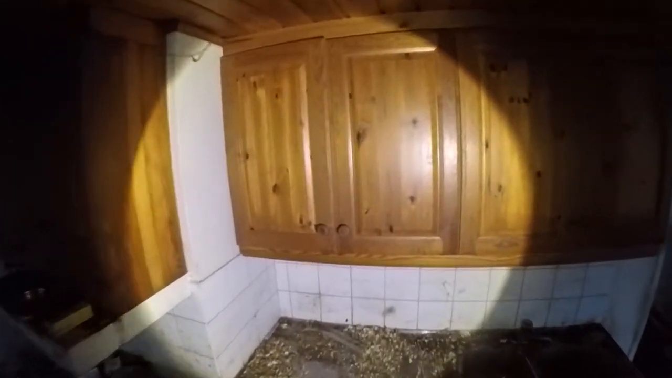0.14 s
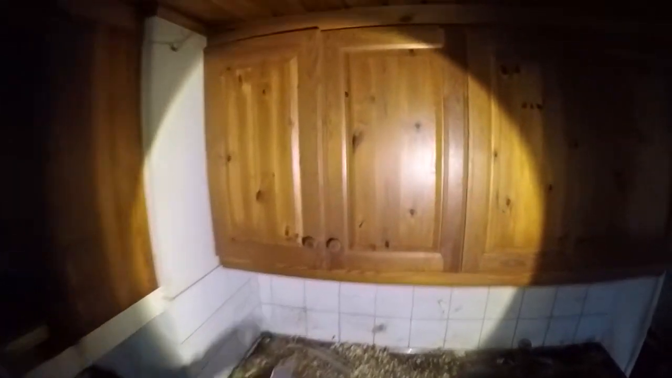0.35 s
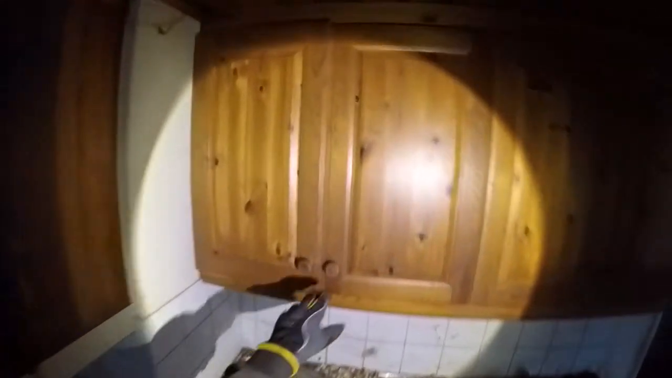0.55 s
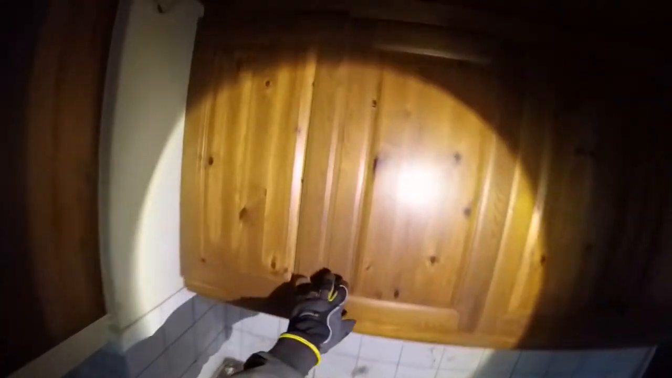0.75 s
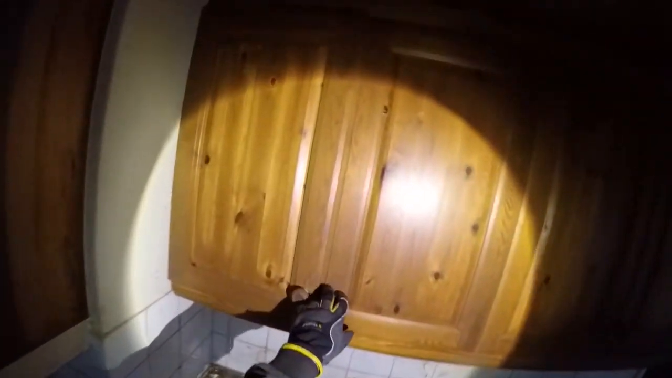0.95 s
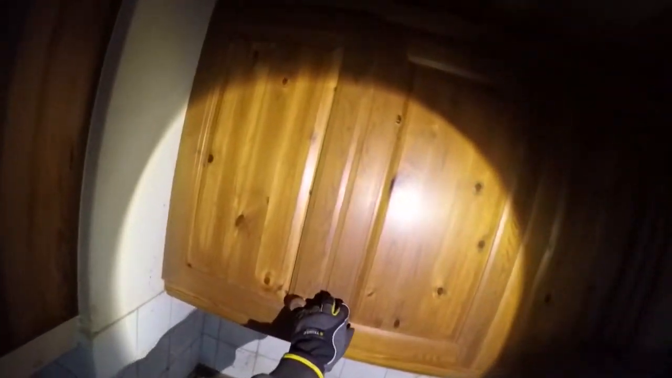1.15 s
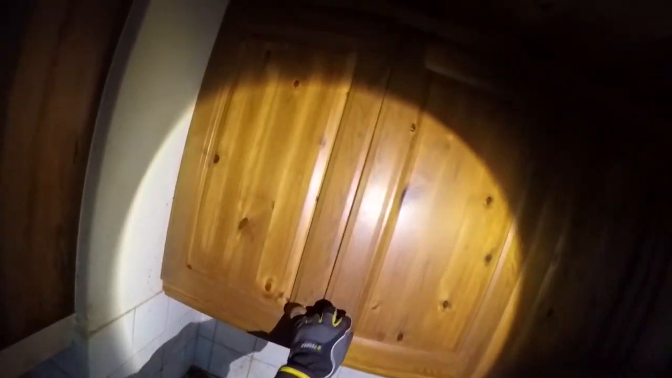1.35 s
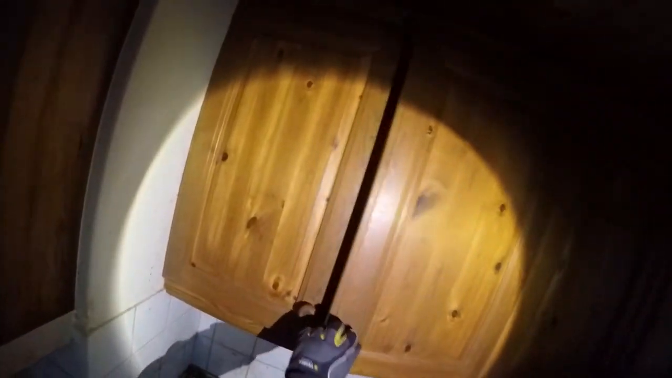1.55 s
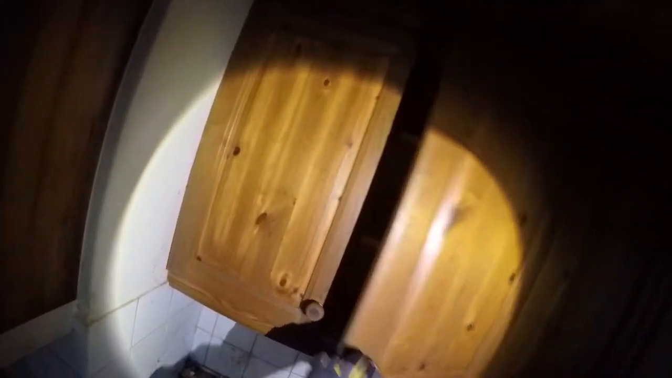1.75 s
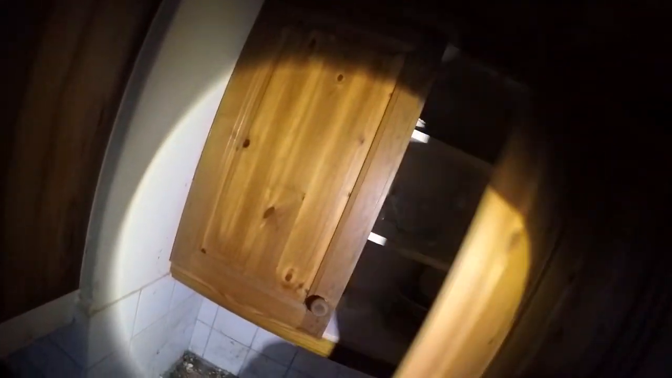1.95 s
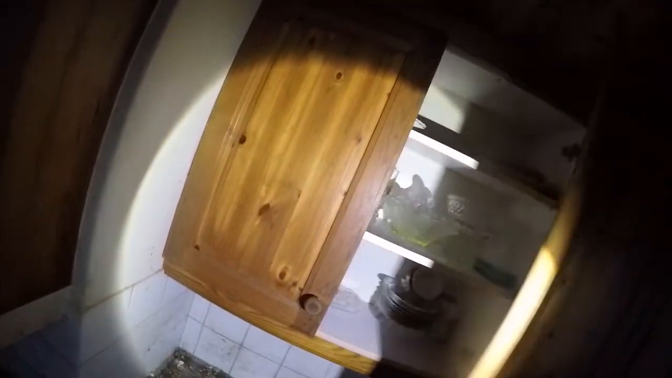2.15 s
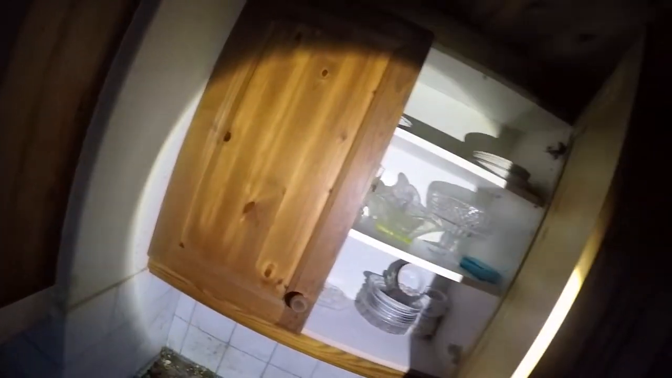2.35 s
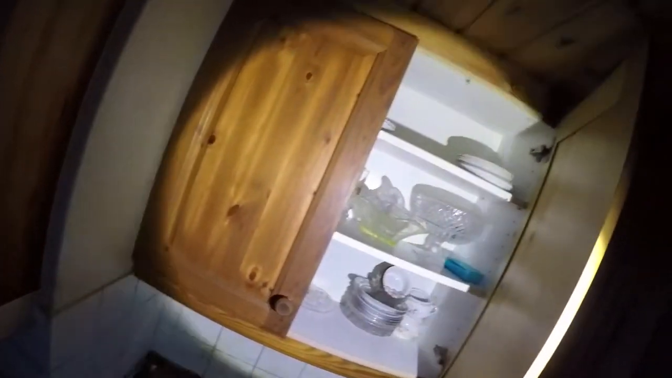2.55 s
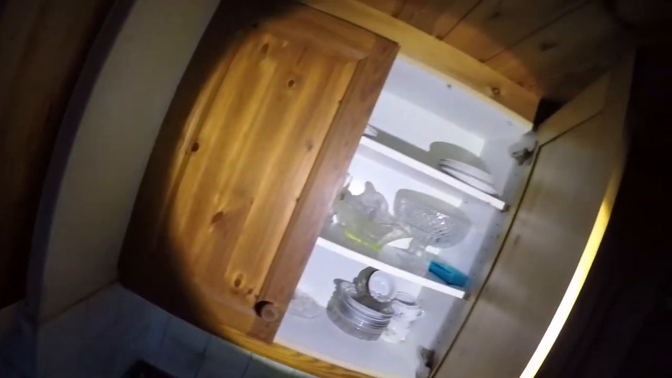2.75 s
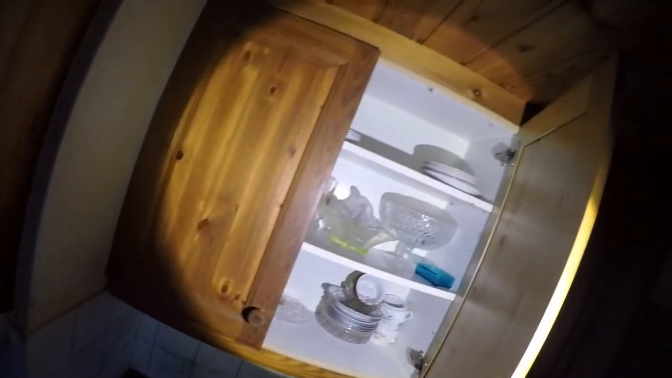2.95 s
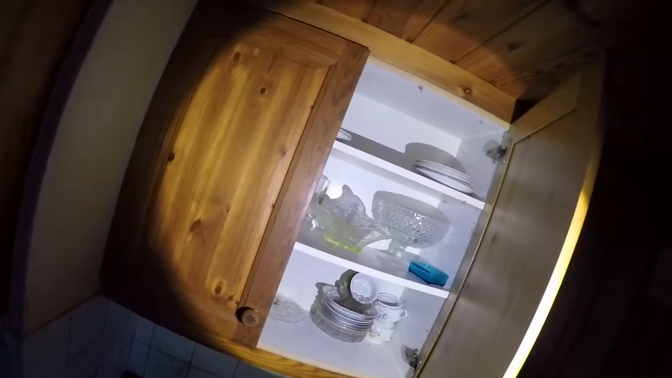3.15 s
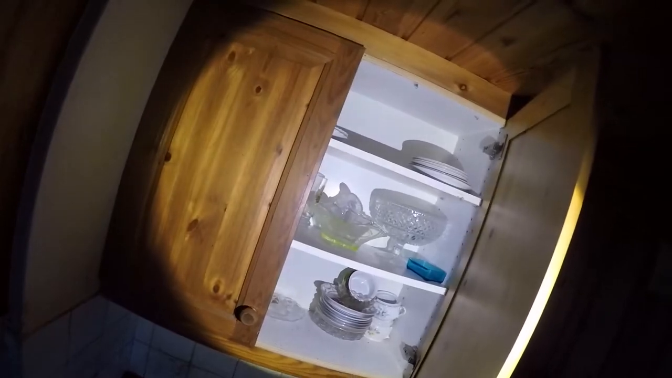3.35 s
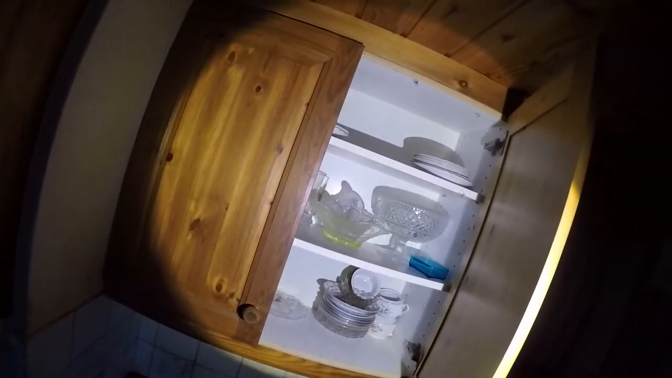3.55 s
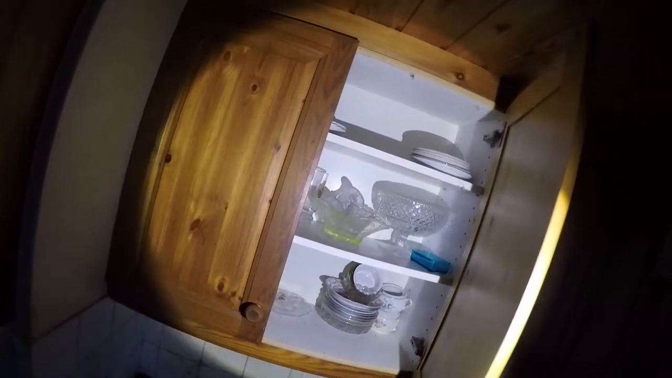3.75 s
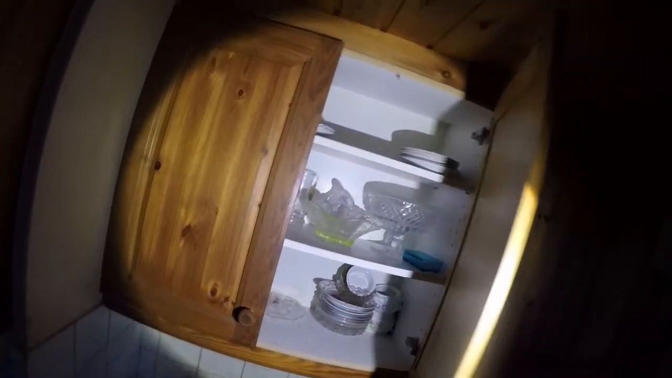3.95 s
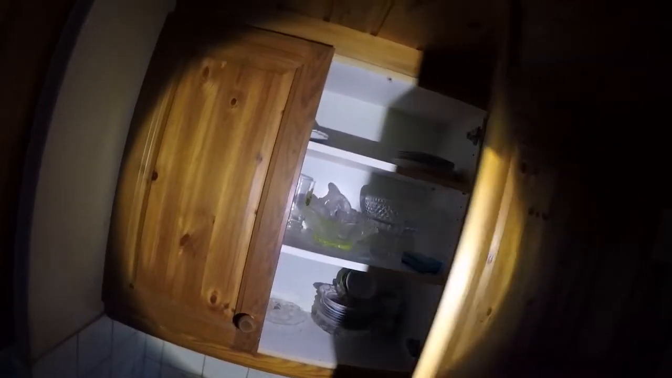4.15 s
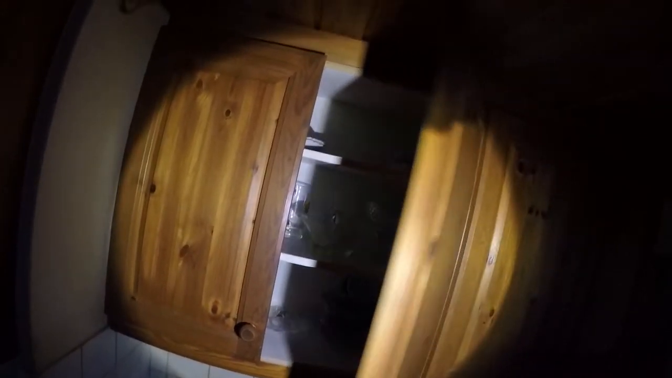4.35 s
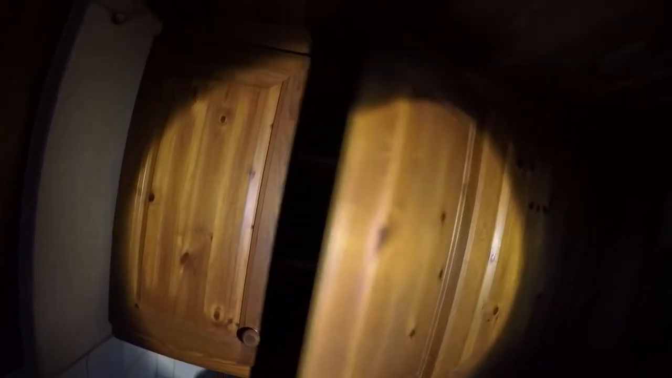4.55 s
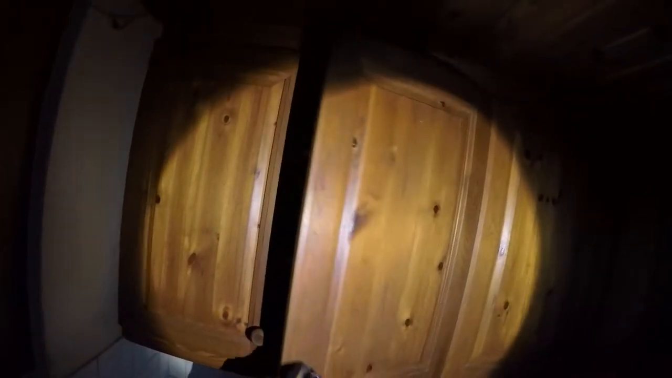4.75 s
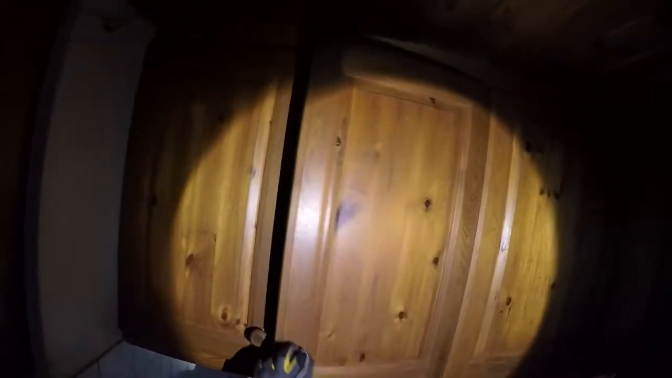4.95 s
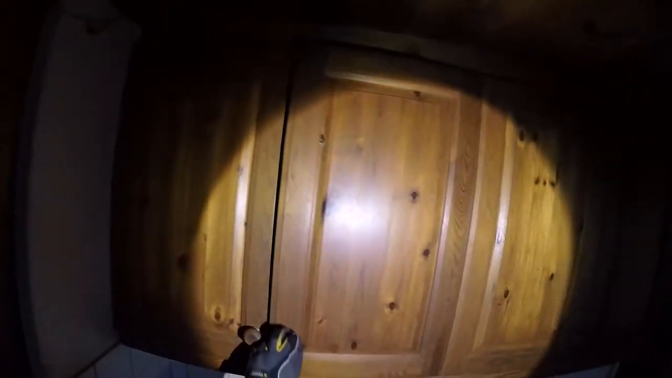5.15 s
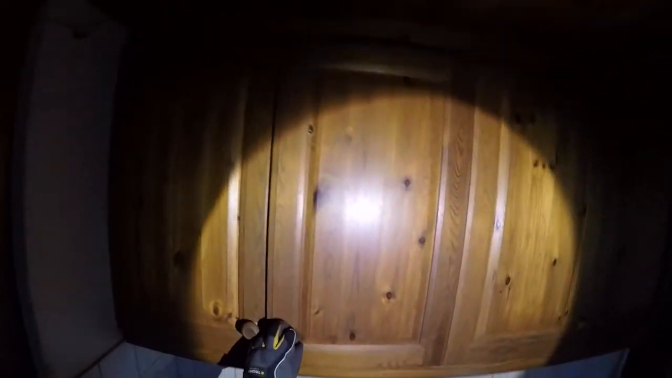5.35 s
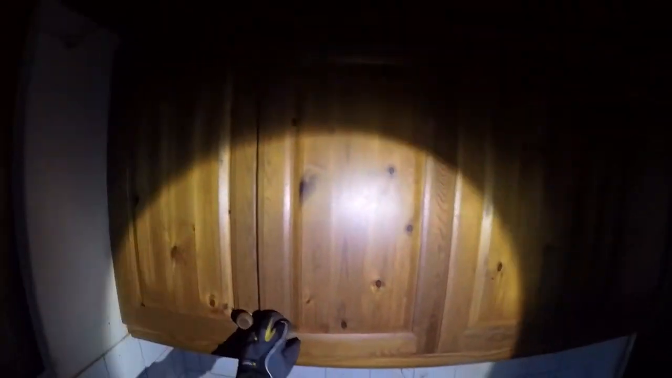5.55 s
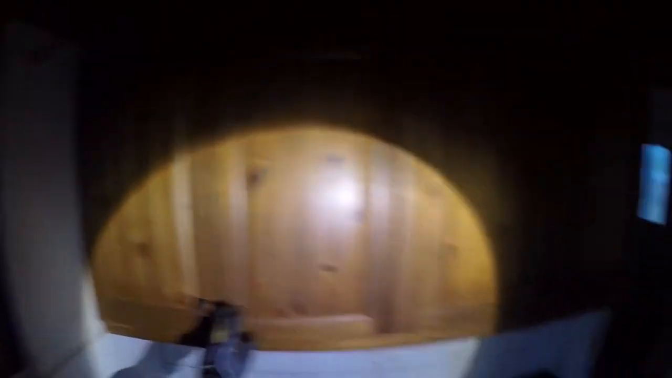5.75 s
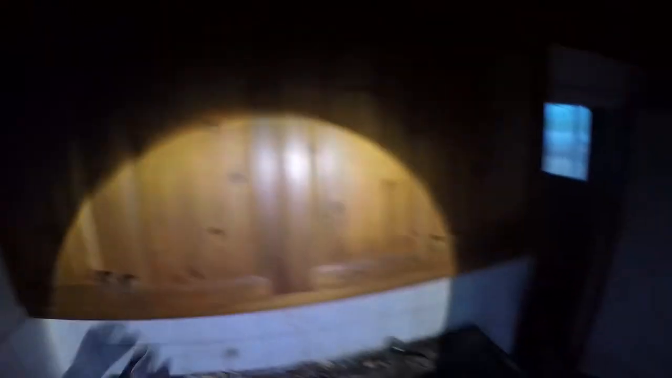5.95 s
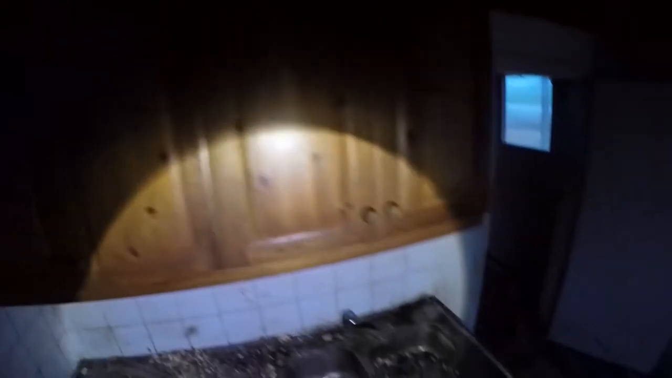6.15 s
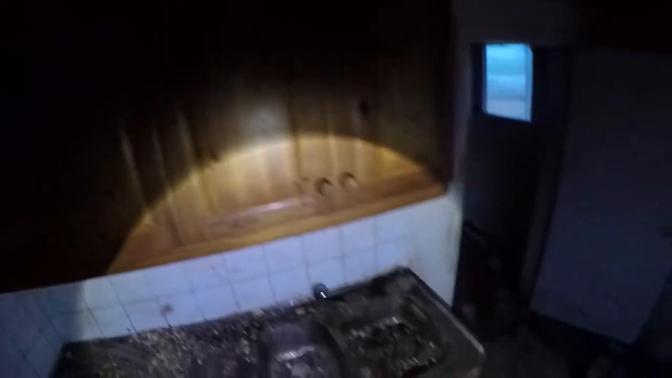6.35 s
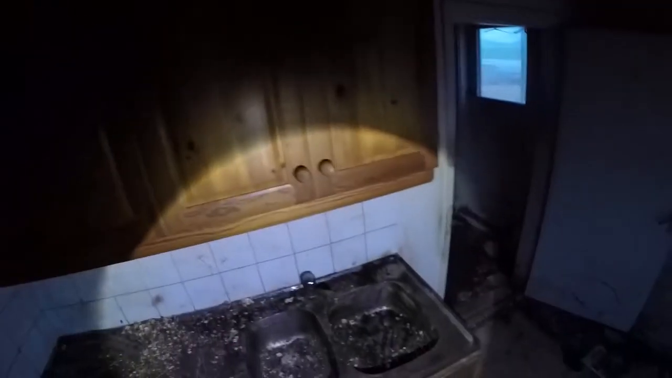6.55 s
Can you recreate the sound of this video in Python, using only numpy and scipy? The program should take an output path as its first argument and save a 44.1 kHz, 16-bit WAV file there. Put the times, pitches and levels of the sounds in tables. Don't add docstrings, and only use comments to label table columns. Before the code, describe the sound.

In a bare tiled kitchen, a cupboard door jerks open with clattering hollow knocks, pauses in low rumble, and swings shut with a single woody thump.

```python
import sys
import numpy as np
from scipy import signal
from scipy.fft import rfft, irfft, next_fast_len
from scipy.io import wavfile
from scipy.ndimage import uniform_filter1d

SR = 44100
rng = np.random.default_rng(int(sys.argv[2]) if len(sys.argv) > 2 else 0)


def output_pcm(signal):
    pcm = np.clip(np.atleast_2d(signal).T, -1, 1) * 32767
    wavfile.write(sys.argv[1], SR, np.round(pcm).astype(np.int16))


def makeup_ratio(level_db):
    decades = np.asarray(level_db, float) / 20
    return 10 ** decades


N = 295381


def evened(x):
    return x / np.sqrt(np.mean(x ** 2) + 1e-20)


def read(points, hz):
    f, value = np.transpose(points)
    return np.interp(np.log(hz + 1), np.log(f + 1), value)


def add(mix, start_s, sound):
    part = mix[round(start_s * SR):][:len(sound)]
    part += sound[:len(part)]


def coloured(x, spectrum):
    size = next_fast_len(len(x))
    gain = makeup_ratio(read(spectrum, np.fft.rfftfreq(size, 1 / SR)))
    return irfft(rfft(x, size) * gain, size)[:len(x)]


def swell(start_s, length_s):
    u = np.clip((np.arange(N) / SR - start_s) / length_s, 0, 1)
    rise_share = 0.33
    return np.sin(np.pi * u ** (np.log(0.5) / np.log(rise_share))) ** 2


def ring(db, hz, rise_s, t60_s):
    t = np.arange(0, max(t60_s, 0.33), 1 / SR)
    shape = (1 - np.exp(-t / rise_s)) * makeup_ratio(-60 * t / t60_s)
    return makeup_ratio(db) * shape / shape.max() * np.sin(2 * np.pi * hz * t)


def rings(rows, rise_s):
    out = np.zeros(N)
    for start_s, db, hz, t60_s in rows:
        add(out, start_s, ring(db, hz, rise_s, t60_s))
    return out


# frequency in Hz, t60 in seconds.
ROOM_DECAY = [(60, 0.8), (160, 0.19), (420, 0.54), (1100, 0.47), (2900, 0.45), (7700, 0.43)]


def kitchen(x):
    taps = np.zeros(SR)
    at = np.arange(160, SR - 20, 20) + rng.integers(0, 20, (SR - 161) // 20)
    taps[at] = rng.choice([-1., 1.], at.shape)
    hz, t, bands = signal.stft(taps, SR, nperseg=512)
    decay = makeup_ratio(-60 * t / read(ROOM_DECAY, hz)[:, None])
    tail = signal.istft(bands * decay, SR, nperseg=512)[1]
    return signal.fftconvolve(x, tail / np.linalg.norm(tail))[:N]


# time in seconds, level in dB.
OPENNESS = [(0, -0.5), (1.15, 0.3), (1.4, 0.5), (2.5, -12), (3.799, -15), (4.3, -16), (4.52, -8.5),
            (4.7, -22.5), (5.399, -16), (6.0, -13.5), (6.7, -14)]
# start in seconds, length in seconds, rumble lift in dB.
STIRS = [
    (0.882, 2.2, 9.5),
    (4.104, 1.3, 1.5),
    (5.504, 0.82, 7.5),
]
# frequency in Hz, level in dB per Hz.
RUMBLE_SPECTRUM = [(12, -30), (20, 0.5), (70, 1.5), (97, -8), (147, -8), (210, -15), (274, -13),
                   (700, -29.5), (910, -53), (1540, -120)]
# frequency in Hz, level in dB per Hz.
DRAUGHT_SPECTRUM = [(500, -32.5), (800, -0.5), (1300, 2.3), (2800, -1.5), (3300, -14), (6000, -12.5),
                    (9000, -42)]


def house():
    open_db = np.interp(np.arange(N) / SR, *np.transpose(OPENNESS))
    stir_db = sum(db * swell(start_s, length_s) for start_s, length_s, db in STIRS)
    rumble_noise, hum_noise, draught_noise, lump_noise = rng.standard_normal((4, N))
    lumps = makeup_ratio(2.4 * evened(uniform_filter1d(lump_noise, 6000)))
    rumble = makeup_ratio(-63.5 + 0.15 * open_db + stir_db) * lumps
    rumble = rumble * evened(coloured(rumble_noise, RUMBLE_SPECTRUM))
    hum_band = [(150, -44.5), (225, -5.5), (241, 7.5), (258, -13.5), (400, -49.5)]  # (Hz, dB)
    hum = makeup_ratio(-65 + open_db) * evened(coloured(hum_noise, hum_band))
    draught = makeup_ratio(-72 + 0.5 * open_db) * evened(coloured(draught_noise, DRAUGHT_SPECTRUM))
    return rumble + hum + draught


# frequency in Hz, level in dB per Hz.
HISS_SPECTRUM = [(76, -31), (140, -0.5), (190, -11.5), (276, -1), (350, -17), (444, -10), (600, -18.5),
                 (1300, -16.5), (3100, -19), (9600, -28), (14200, -31), (14950, -32.5), (15200, -56)]


def microphone_noise():
    hiss = makeup_ratio(-72.5) * evened(coloured(rng.standard_normal(N), HISS_SPECTRUM))
    whine_band = [(9000, -39), (9600, -9), (9750, 2.0), (9900, -4.5), (10500, -38.5)]  # (Hz, dB)
    whine = makeup_ratio(-93) * evened(coloured(rng.standard_normal(N), whine_band))
    return hiss + whine


# start in seconds, peak in dB, centre of the modes reached in Hz,
# damping factor on t60.
PANEL_BLOWS = [(0.2084, -42.5, 160, 0.37), (0.2238, -58.5, 460, .47), (0.3766, -40.5, 307, 1.65),
               (1.333, -25.5, 257, 2.9), (1.346, -25, 400, 1), (1.36, -23, 442, 0.51),
               (1.377, -23.5, 321, .65), (1.4904, -13, 332, 1), (1.498, -33, 455, 0.32),
               (1.64, -23, 222, 1.02), (1.67, -27, 250, 0.87), (1.779, -22.5, 173, 1.2),
               (1.797, -33.5, 490, 0.5), (1.917, -28, 177, 0.55), (2.06, -39, 188, 1.6),
               (2.181, -45.5, 186, 1.14), (2.583, -46.5, 160, 1.55), (5.137, -48, 156, 1.9),
               (5.186, -23, 380, 0.8), (5.199, -16.5, 293, 0.54), (5.661, -53.5, 270, 1.3),
               (5.751, -55.5, 247, 1.2), (5.862, -58.5, 352, 1.4), (6.313, -50, 192, 0.91),
               (6.331, -56, 422, .86), (6.5, -63, 411, 1.6)]
# pitch in Hz, level in dB, t60 in seconds.
PANEL_MODES = [(141.4, 1, 0.24), (168.1, 2, 0.37), (200.8, -2, 0.28), (245, -4.5, .12), (281, -0.5, 0.079),
               (286, -7, .28), (336.6, 0, 0.071), (396.4, -5.5, 0.28), (464, -10.5, 0.3), (616, -10, 0.19),
               (764, -3.5, 0.078), (927, -9, 0.12), (1021, -11.5, 0.099), (1120, -8, 0.22)]


def knocks():
    out = np.zeros(N)
    signs = rng.choice([-1., 1.], (len(PANEL_BLOWS), len(PANEL_MODES)))
    size = SR // 4
    fade = np.cos(np.linspace(0, np.pi / 2, size)) ** 0.5
    for (start_s, db, centre_hz, damping), blow_signs in zip(PANEL_BLOWS, signs):
        spread_oct = 1.077 - 0.01 * db
        body = np.zeros(size)
        for sign, (hz, mode_db, t60_s) in zip(blow_signs, PANEL_MODES):
            reach_db = mode_db - 6 * (np.log2(hz / centre_hz) / spread_oct) ** 2
            body += sign * ring(reach_db, hz, 0.0011, t60_s * damping)[:size]
        body *= fade
        add(out, start_s, makeup_ratio(db) * body / abs(body).max())
    return out


# start in seconds, peak in dB, pitch in Hz, t60 in seconds.
FOOTFALLS = [
    (.21, -43.5, 101, 0.048),
    (.375, -48.5, 105.5, .13),
    (1.053, -46, 86.1, 0.13),
    (2.88, -50.5, 72, 0.069),
    (4.985, -57.5, 70.8, 0.21),
    (5.422, -71, 91, 0.11),
    (5.655, -52.5, 76.5, 0.17),
    (5.719, -52.5, 130, .12),
    (5.793, -50.5, 57.8, .11),
    (6.609, -55, 55.7, 0.14),
]


def steps():
    return rings(FOOTFALLS, rise_s=0.009)


# frequency in Hz, level in dB per Hz.
SNAP_SPECTRUM = [(250, -33), (500, -6), (1000, -7), (1700, -11), (2300, -8.5), (2900, -12), (3400, -22),
                 (5000, -24.5), (6800, -38), (7800, -51.5), (9200, -50.5), (9700, -47.5), (10300, -48.5),
                 (15000, -57)]


def click(tilt_db, lift_hz):
    size = 2048
    f = abs(np.fft.fftfreq(size, 1 / SR)) + 20
    lift_db = 5 * np.exp(-(np.log2(f / lift_hz) / 0.75) ** 2)
    log_gain = np.log(makeup_ratio(read(SNAP_SPECTRUM, f) + tilt_db * np.log2(f / 2000) + lift_db))
    pulse = np.fft.ifft(np.exp(signal.hilbert(log_gain).conj())).real[:size // 2]
    return pulse / abs(pulse).max()


# start in seconds, peak in dB, hardness in dB per octave,
# length in seconds, room share in dB.
GRIT_BREAKS = [
    (0.369, -51, -6.5, .0038, -13),
    (0.3776, -34, 0.35, 0.0017, 5.5),
    (0.913, -51, 5, 0.0027, -3),
    (0.95, -61, 8, 0.0092, -13),
    (6.309, -65.5, 5, 0.011, 4.5),
    (6.523, -65.5, 4, 0.038, -2),
]
# start in seconds, peak in dB, hardness in dB per octave.
EDGE_SLIPS = [
    (1.271, -63, -2.4),
    (1.304, -53.5, -0.8),
    (1.318, -50, 4),
    (1.331, -43.5, 1.2),
    (1.344, -33, 2),
    (1.358, -31, -6),
    (1.373, -39, -1),
]
# start in seconds, peak in dB, hardness in dB per octave,
# length in seconds.
EDGE_CRACKS = [(1.4887, -27, 0.5, .0061), (1.498, -21.5, 0.7, 0.0075), (1.5042, -22.5, -1.85, 0.0047),
               (1.634, -39.5, 1, 0.0054), (1.661, -40.5, 0.1, .018), (1.7768, -39.5, 3.5, 0.0054),
               (1.799, -39, 0.3, 0.0063), (1.817, -47, 0.4, 0.028), (1.912, -47, 0.5, 0.018),
               (2.057, -59, 5.5, 0.03), (2.104, -54.5, 1.3, 0.0055), (2.579, -44, 0.1, 0.0074),
               (2.582, -52, 0.5, 0.0058), (5.185, -32, -5.5, 0.0078), (5.1899, -35, 0.2, 0.0056),
               (5.233, -45, -0.5, 0.015)]


def cracks():
    direct, paths, t = np.zeros(N), np.zeros((3, N)), np.arange(4096) / SR
    slips = [(*row, 0.015, -6) for row in EDGE_SLIPS]
    snaps = [(*row, -2.03) for row in EDGE_CRACKS]
    rows = sorted(slips + snaps + GRIT_BREAKS)
    noises = rng.standard_normal((len(rows), 2, 4096))
    for k, (row, (grain, unevenness)) in enumerate(zip(rows, noises)):
        start_s, db, tilt_db, length_s, room_db = row
        pulse = click(tilt_db, 1990 * 2 ** (1.27 * tilt_db))
        envelope = np.exp(-t / length_s) * np.minimum(4 * t / length_s, 1)
        spray = 0.2 * grain * makeup_ratio(4.22 * unevenness) * envelope
        sudden = np.exp(-(length_s / 0.012) ** 4)
        spray[0] = 0.81 * sudden
        crack = makeup_ratio(db) * signal.fftconvolve(spray, pulse)
        add(direct, start_s, crack)
        whole = makeup_ratio(db) * np.linalg.norm(spray) * sudden * pulse
        add(paths[k % 3], start_s, makeup_ratio(room_db) * whole)
        add(paths[k % 3], start_s, makeup_ratio(room_db) * (1 - sudden) * crack)
    return direct + sum(kitchen(path) for path in paths)


# start in seconds, peak in dB, pitch in Hz, t60 in seconds.
HARD_PARTS = [
    (.3757, -38.5, 2024, 0.04),
    (.3757, -44, 1644, 0.056),
    (2.579, -52.5, 1007, 0.053),
    (2.579, -54.5, 1653, 0.063),
    (2.58, -53, 2494, 0.055),
]


def ticks():
    return rings(HARD_PARTS, rise_s=0.0005)


# start in seconds, peak in dB, pitch in Hz, t60 in seconds.
DOOR_FLEXES = [
    (1.248, -46.5, 97, 0.81),
    (1.343, -33, 78.2, 0.34),
    (1.632, -19, 81.3, 0.16),
    (1.697, -30, 86.7, .16),
    (2.6115, -30, 67, 0.09),
    (2.668, -43.5, 73.4, .25),
    (5.133, -41.5, 70.6, 0.43),
]


def flex():
    return rings(DOOR_FLEXES, rise_s=0.012)


def air():
    blows = DOOR_FLEXES + HARD_LANDINGS + FRAME_SLAPS
    puffs = [(start_s + 0.0095, db - 9, 59.7, 0.091) for start_s, db, *_ in blows]
    return rings(puffs, rise_s=0.009)


# start in seconds, peak in dB, pitch in Hz, t60 in seconds.
SINGING_BOARDS = [
    (1.33, -22, 195.4, 0.21),
    (1.357, -21.5, 207.6, 0.07),
    (1.372, -27.5, 245, 0.19),
    (1.4905, -19, 169.5, .12),
    (1.505, -20, 298.3, 0.1),
    (1.535, -26, 283.3, 0.21),
    (1.52, -35.5, 471.5, .35),
    (5.1925, -22, 193.3, 0.087),
    (5.196, -33, 420.8, 0.27),
    (5.2211, -30, 286, .18),
]


def boards():
    return rings(SINGING_BOARDS, rise_s=0.0051)


# start in seconds, peak in dB, pitch in Hz, t60 in seconds.
HARD_LANDINGS = [
    (1.4897, -11.5, 104, .19),
    (2.585, -36, 87.4, .15),
    (5.189, -22.5, 62.3, .063),
    (5.2088, -17.5, 97.6, .14),
    (5.263, -43, 101, .088),
    (5.352, -49, 113, .083),
]


def landings():
    return rings(HARD_LANDINGS, rise_s=0.0045)


# start in seconds, peak in dB, pitch in Hz, t60 in seconds.
THIN_THINGS = [
    (1.513, -70, 11400, .08),
    (4.571, -73, 611, .31),
    (5.661, -69, 1301, .31),
    (5.775, -66, 1167, .4),
    (5.781, -62, 720, .24),
    (5.801, -64, 2025, .22),
    (5.806, -68, 961, .2),
    (5.872, -66, 954, .45),
    (5.98, -72, 950, .3),
]


def chinks():
    return rings(THIN_THINGS, rise_s=0.011)


# start in seconds, peak in dB.
FRAME_SLAPS = [
    (1.777, -15.5),
    (1.894, -23.5),
    (2.06, -30),
    (2.177, -39.5),
    (2.32, -57),
]


def wobble():
    size, t = np.zeros(N), np.arange(SR) / SR
    quick = makeup_ratio(-60 * t / 0.18) * (1 - np.exp(-t / 0.0078))
    linger = makeup_ratio(-9.5 - 60 * t / 0.69) * (1 - np.exp(-t / 0.03))
    for start_s, db in FRAME_SLAPS:
        add(size, start_s, makeup_ratio(db) * 1.34 * (quick + linger))
    free_hz = 97
    return size * np.sin(2 * np.pi * free_hz * (np.arange(N) / SR - FRAME_SLAPS[0][0]))


# start in seconds, length in seconds, peak in dB.
SOLE_DRAGS = [
    (5.608, 0.22, -67.5),
    (5.753, 0.2, -62),
    (5.907, 0.52, -77.5),
    (6.3, 0.21, -79),
    (6.498, 0.18, -79),
    (6.616, .06, -85),
]
# frequency in Hz, level in dB per Hz.
GRIT_SPECTRUM = [(400, -25), (700, -4.5), (1200, -11.5), (2100, -4.5), (3000, -7), (3700, -14.5),
                 (6500, -16), (7500, -33), (15000, -23)]


def scuff():
    unevenness = evened(uniform_filter1d(rng.standard_normal(N), 120))
    grains = rng.standard_normal(N) * makeup_ratio(1.8 * unevenness)
    drags = sum(makeup_ratio(db) * swell(start_s, length_s) for start_s, length_s, db in SOLE_DRAGS)
    return evened(coloured(grains, GRIT_SPECTRUM)) * drags


def scene():
    low = steps() + flex() + air() + landings() + wobble()
    panels = knocks() + ticks() + boards()
    drag = scuff()
    room = kitchen(makeup_ratio(-13) * low) + kitchen(makeup_ratio(-8.5) * panels + makeup_ratio(-9.5) * drag)
    return (low + panels + cracks() + drag + chinks() + room + house())[None]


def band_limit(x):
    return signal.sosfilt(signal.butter(12, 15200, fs=SR, output="sos"), x)


def record(dry):
    ceiling = 0.385
    x = (dry + microphone_noise()) / ceiling
    return band_limit(ceiling * x / (1 + x ** 6) ** (1 / 6))


dry = scene()
out = record(dry)
output_pcm(out)
```